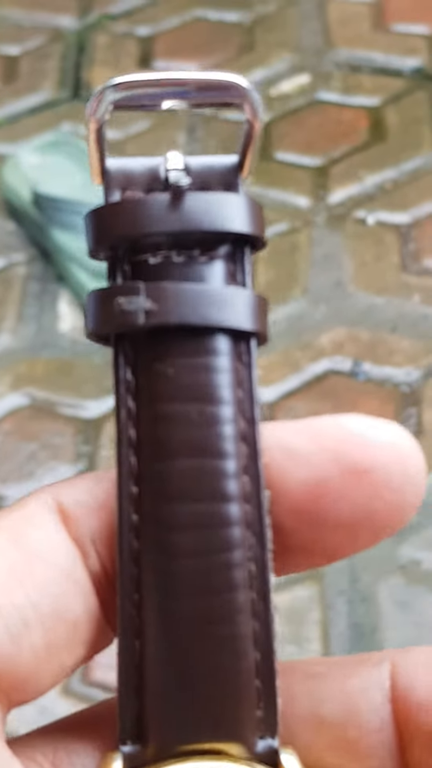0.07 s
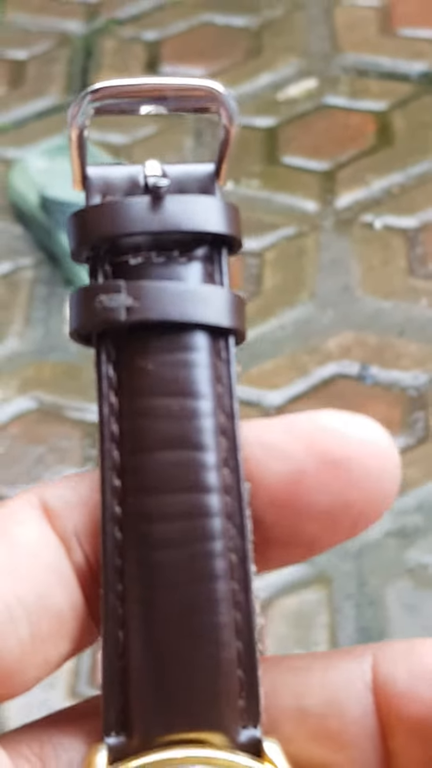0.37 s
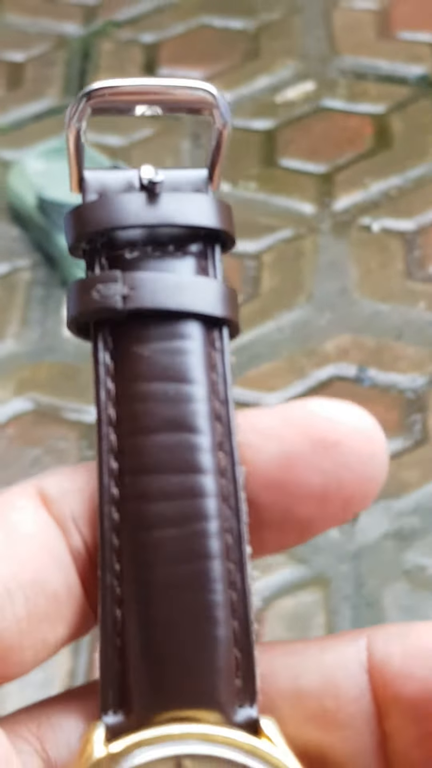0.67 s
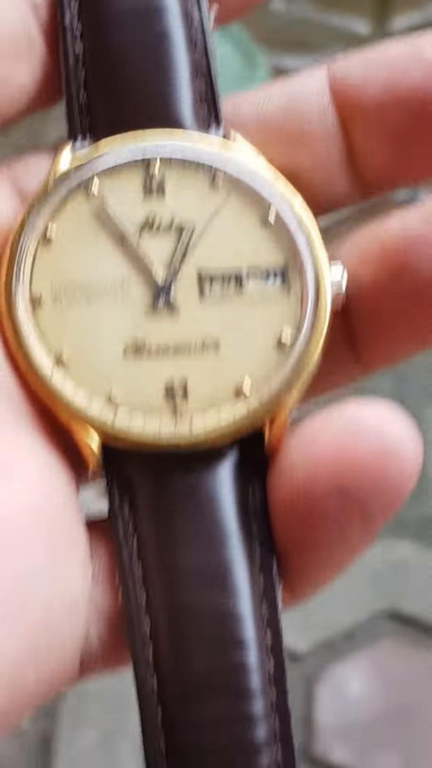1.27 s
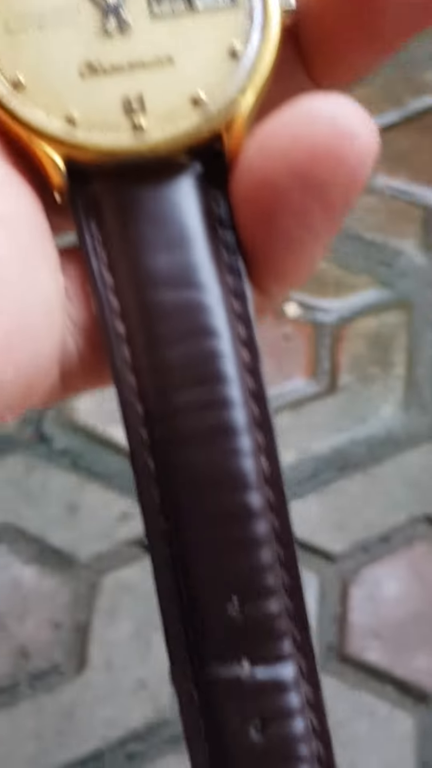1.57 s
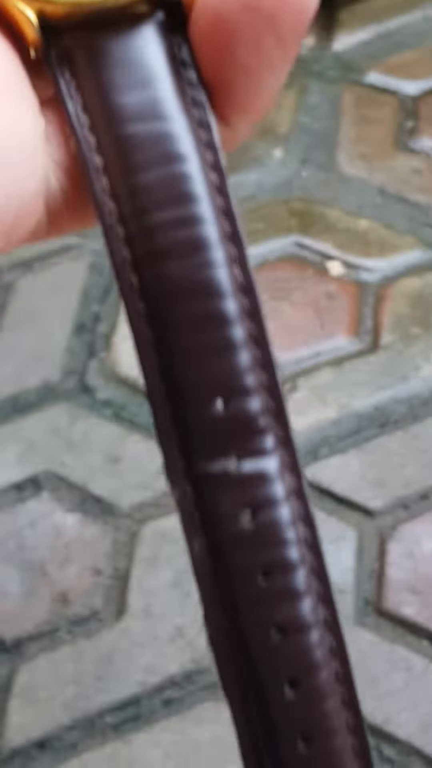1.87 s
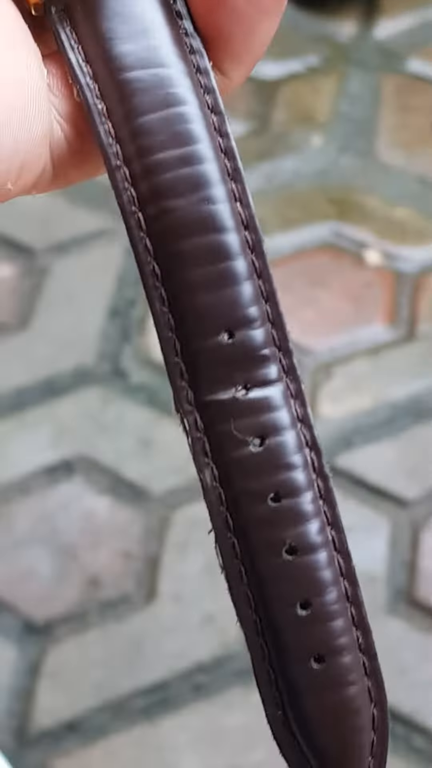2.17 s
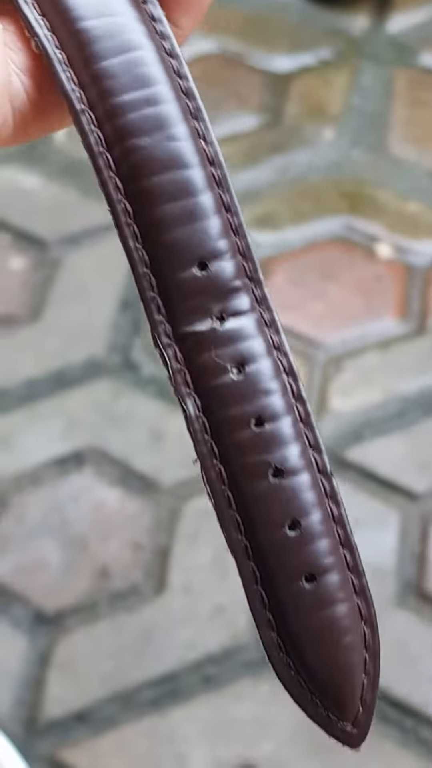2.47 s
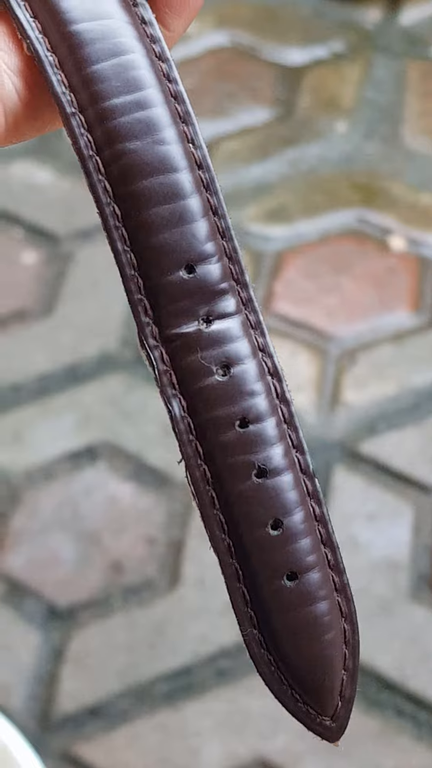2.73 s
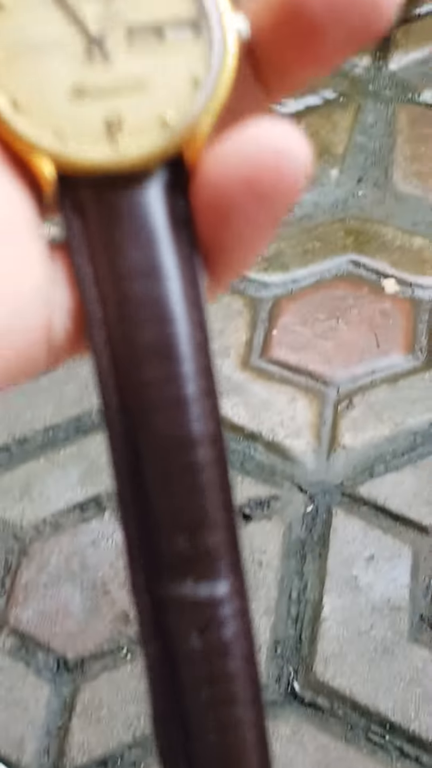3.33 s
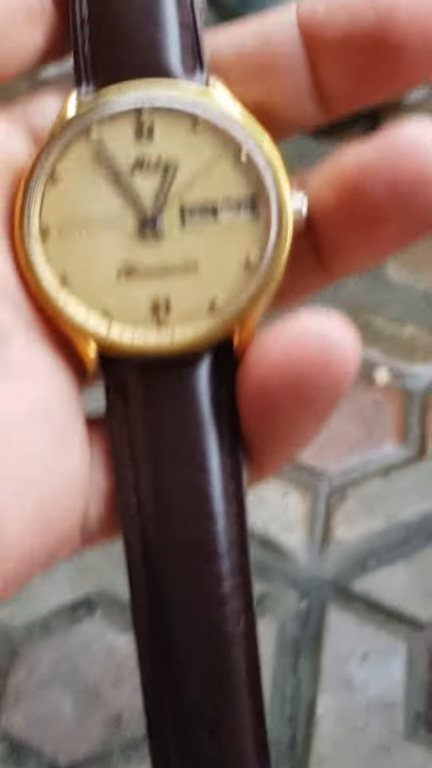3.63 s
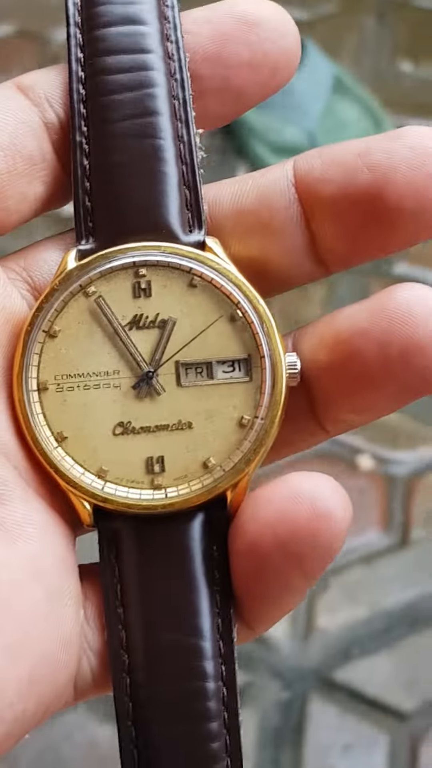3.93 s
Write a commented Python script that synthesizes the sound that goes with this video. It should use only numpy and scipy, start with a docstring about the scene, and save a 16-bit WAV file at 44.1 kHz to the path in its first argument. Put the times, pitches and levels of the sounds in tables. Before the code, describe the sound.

One sharp metallic click from a handled watch, soft bumps, a bird chirp and a distant engine.

```python
"""A wristwatch is turned in the hand: one sharp tick, soft rubs of skin and strap, dull bumps.
A small bird whistles one rising chirp that rings between the walls of a paved yard.
In the distance a motor vehicle swells with exhaust noise, engine tones and a whirr.
Far animals call faintly over low town rumble and a thin hiss."""
import sys
import numpy as np
from scipy import signal
from scipy.fft import rfft, irfft
from scipy.io import wavfile
from scipy.ndimage import map_coordinates

SR = 44100
rng = np.random.default_rng(int(sys.argv[2]) if len(sys.argv) > 2 else 0)


def generate_wav(signal):
    """Clip the signal to [-1, 1] and save it as 16-bit WAV at the path in sys.argv[1]."""
    frames = np.transpose(np.atleast_2d(signal))
    scaled = np.clip(frames, -1, 1) * 32767
    pcm = np.round(scaled).astype(np.int16)
    wavfile.write(sys.argv[1], SR, pcm)


N = 176400
TIME = np.arange(N) / SR
BIN_HZ = np.arange(N // 2 + 1) * SR / N
HAND_PAN_DB, HAND_T60_S = 19.5, 0.34  # pan: left minus right


# Metal resonances: pitch_hz, width_hz, gain_db
WATCH_MODES = [(6060, 1600, -3), (11100, 1800, -2.5), (13800, 2500, -7)]

def watch_tick():
    """One impact and a brief rattle ring the watch's metal."""
    start_s, impact_db, rattle_db, rattle_decay_s = 1.1123, -19, -36, 0.004
    rattle_envelope = (TIME > start_s) * np.exp(-np.abs(TIME - start_s) / rattle_decay_s)
    contact = from_db(rattle_db) * rng.standard_normal(N) * rattle_envelope
    contact[int(start_s * SR)] += from_db(impact_db)
    ring = np.zeros(N)
    for k, (pitch_hz, width_hz, gain_db) in enumerate(WATCH_MODES):
        resonance = signal.iirpeak(pitch_hz, pitch_hz / width_hz, fs=SR)
        ring += (-1) ** k * from_db(gain_db) * signal.lfilter(*resonance, contact)
    return in_yard(butter(ring, "high", hz=4200), HAND_PAN_DB, HAND_T60_S, wet_db=1)


# Friction strokes: start_s, length_s, centre_hz, width_hz, level_db
STRAP_RUBS = [(.73, .047, 5730, 1290, -64), (.95, 0.035, 9300, 2000, -70), (1.64, 0.037, 12300, 4000, -66),
              (1.675, 0.046, 9100, 2800, -66.5), (1.92, 0.053, 1250, 199, -70.5),
              (2.03, 0.048, 3680, 1200, -70.5), (2.13, 0.084, 11900, 3000, -66),
              (2.26, .06, 5000, 3500, -69), (2.85, 0.03, 7900, 4030, -70.5),
              (2.885, 0.059, 4260, 1080, -62), (3.005, 0.039, 7450, 2800, -59),
              (3.27, 0.044, 9400, 2620, -66.5), (3.72, 0.062, 5260, 700, -77.5),
              (3.94, 0.034, 10200, 3500, -68.5)]

def strap_rubs():
    """Skin and strap slide in short, grainy strokes."""
    strokes = bursts(STRAP_RUBS, rise_share=0.38, order=1)
    grain_db = 1.5 * drift(rate_hz=99)
    return in_yard(strokes * from_db(grain_db), HAND_PAN_DB, HAND_T60_S)


# Shifts of the grip: start_s, length_s, centre_hz, width_hz, level_db
GRIP_BUMPS = [(1.74, 0.11, 97, 52.4, -36.5), (1.71, 0.074, 337, 158, -64), (2.05, 0.34, 124, 81, -46.5),
              (2.80, 0.11, 58, 55.4, -34.5), (2.81, .1, 219, 109, -44.5), (3.23, 0.21, 225, 70, -48),
              (3.39, 0.098, 86.5, 64, -33.5), (3.5, 0.25, 50, 22.2, -41)]

def grip_bumps():
    """The shifting grip bumps dully; the fingers give one soft knock."""
    knock_s, knock_hz, decay_s, knock_db = 3.3605, 318, 0.0033, -26
    age_s = np.maximum(TIME - knock_s, 0)
    knock = from_db(knock_db) * np.sin(2 * np.pi * knock_hz * age_s) * np.exp(-age_s / decay_s)
    bumps = bursts(GRIP_BUMPS, rise_share=0.28)
    return butter(bumps + knock, "low", hz=820) * pan(db=-20)


# Whistle contour: time_s, pitch_hz
BIRD_PITCH = [(1.245, 4600), (1.258, 4780), (1.272, 4870), (1.286, 4960), (1.305, 5130), (1.320, 5290),
              (1.337, 5350), (1.353, 5620), (1.366, 6150), (1.380, 6800), (1.393, 6900), (1.408, 6720)]
# Whistle envelope: time_s, level_db
BIRD_LEVEL = [(1.245, -67), (1.257, -55), (1.272, -52), (1.284, -57), (1.308, -58), (1.319, -54),
              (1.337, -53.5), (1.348, -55), (1.366, -48.5), (1.380, -51), (1.393, -56), (1.408, -57)]
# Harmonics 2 and 3: gain_db
BIRD_OVERTONES = [-21, -27]
# Direct path, swelling and fading against the echoes: time_s, gain_db
BIRD_DIRECT = [(1.25, 0), (1.272, 5), (1.284, 1), (1.306, -1), (1.32, 7.5), (1.336, 7.5), (1.35, -4),
               (1.41, -5)]

def bird_chirp():
    """A nearly pure whistle climbs slowly, then flicks upward."""
    start_s, end_s, edge_s = BIRD_PITCH[0][0], BIRD_PITCH[-1][0], 0.012
    pitch_hz = in_time(BIRD_PITCH) + 42 * drift(rate_hz=320)
    phase = 2 * np.pi * np.cumsum(pitch_hz) / SR
    overtones = sum(from_db(db) * np.sin(k * phase) for k, db in enumerate(BIRD_OVERTONES, 2))
    gate = np.clip(np.minimum(TIME - start_s, end_s - TIME) / edge_s, 0, 1)
    level_db = in_time(BIRD_LEVEL) + 1.4 * drift(rate_hz=90)
    whistle = np.sqrt(2) * (np.sin(phase) + overtones) * from_db(level_db) * gate
    return in_yard(whistle, pan_db=15, t60_s=0.47, wet_db=-2, direct_db=in_time(BIRD_DIRECT))


# Exhaust colour: frequency_hz, gain_db
EXHAUST_SPECTRUM = [(150, -3), (260, -5.5), (400, -8), (520, -11), (680, -18), (790, -22.5), (1100, -27),
                    (1600, -35.5), (3000, -63)]
# Exhaust balance: frequency_hz, pan_db
EXHAUST_PAN = [(200, -1.5), (380, 9.5), (520, 7.5), (700, 11), (1300, 2.5)]
# Exhaust swell: time_s, level_db
EXHAUST_LEVEL = [(0, -74), (.9, -69.5), (1.3, -69.5), (1.801, -64), (2.3, -52.5), (2.899, -52),
                 (3.35, -51.5), (3.7, -55), (4, -56)]

def exhaust():
    """Exhaust noise swells, its upper part to the left."""
    spectrum = rfft(noise(EXHAUST_SPECTRUM)) * side_gains(per_bin(EXHAUST_PAN))
    return irfft(spectrum, N) * from_db(in_time(EXHAUST_LEVEL))


# Engine partials: pitch_hz, glide_hz_per_s, peak_s, half_length_s, level_db, pan_db
ENGINE_TONES = [(275.5, 7.5, 3.1, 0.79, -55, 4.5), (399.1, -5, 3.2, 1.25, -61.5, -2.5),
                (514.5, -6, 2.95, 0.47, -62.5, 14), (656, -10.5, 2.6, 0.48, -68.5, 10)]

def engine_tones():
    """Held tones waver with engine speed; each glides a little and swells in turn."""
    out = np.zeros((2, N))
    speed = 1 + 0.004 * drift(rate_hz=4.24)
    for pitch_hz, glide_hz_per_s, peak_s, half_length_s, level_db, pan_db in ENGINE_TONES:
        hz = (pitch_hz + glide_hz_per_s * (TIME - peak_s)) * speed
        phase = 2 * np.pi * np.cumsum(hz) / SR
        flutter_db = 2 * drift(rate_hz=5)
        swell = from_db(level_db + flutter_db) / (1 + ((TIME - peak_s) / half_length_s) ** 4)
        # Echoes shift the phase differently on each side.
        scatter_rad = 0.7 * np.array([drift(rate_hz=9.9) for _ in range(2)])
        out += np.sqrt(2) * swell * np.sin(phase + scatter_rad) * pan(pan_db)
    return out


# Whirr colour: frequency_hz, gain_db
WHIRR_SPECTRUM = [(1200, -15.5), (1700, -7.5), (2250, 5.5), (2700, -6), (3400, -13.5), (4600, -12.5),
                  (6500, -19.5), (10000, -16)]
# Whirr swell: time_s, level_db
WHIRR_SWELL = [(0, -102), (1.8, -83), (1.93, -67.5), (2.3, -67), (2.55, -63), (2.78, -67.5), (3.1, -61),
               (3.5, -70), (3.948, -64.5)]

def engine_whirr():
    """A high mechanical whirr wavers in pitch and level."""
    read_index = np.cumsum(1 + 0.04 * drift(rate_hz=4))
    whirr = np.array([map_coordinates(side, [read_index], mode="wrap") for side in noise(WHIRR_SPECTRUM)])
    level_db = in_time(WHIRR_SWELL) + drift(rate_hz=30)
    return whirr * from_db(level_db) * pan(db=7)


# Far calls: start_s, length_s, centre_hz, width_hz, level_db
ANIMAL_CALLS = [(.2, 0.15, 3610, 160, -77), (.3, 0.15, 3080, 340, -74), (.37, 0.071, 870, 397, -68.5),
                (.56, 0.089, 2650, 600, -75.5), (.73, 0.076, 780, 200, -69), (.73, 0.17, 2620, 453, -72),
                (.87, 0.035, 7240, 700, -67), (1.22, 0.054, 830, 130, -68.5),
                (1.463, 0.043, 980, 150, -65.5), (1.575, 0.051, 830, 220, -66),
                (1.6, 0.082, 1330, 350, -75), (3.92, 0.037, 2620, 553, -65)]

def far_animals():
    """Faint, narrow-band calls echo in the yard."""
    return in_yard(bursts(ANIMAL_CALLS, rise_share=0.36), pan_db=17.5, t60_s=0.31)


# Rumble colour: frequency_hz, gain_db
TOWN_SPECTRUM = [(30, -20), (40, -8.5), (53, -2.5), (80, -2), (112, -3.5), (131, -1.5), (150, -11.5),
                 (180, -14), (266, -20), (310, -24), (490, -41), (800, -51), (1500, -69)]
# Rumble envelope: time_s, gain_db
TOWN_LEVEL = [(0, -42), (.4, -45), (.55, -38.5), (.95, -41.5), (1.15, -42), (1.55, -40), (1.7, -36),
              (2.1, -37), (2.47, -38.5), (2.68, -45.5), (2.85, -37), (3.2, -42), (3.45, -35), (3.7, -43.5),
              (4, -38)]
# Rumble balance: time_s, pan_db
TOWN_PAN = [(0, 2), (1.3, 3.5), (1.7, -1.5), (2.3, 1.5), (3.3, 1), (3.7, 3)]

def town_rumble():
    """Low town noise and a wavering drone reach the left side slightly late."""
    trim_db, drone_hz, lag_s = -0.5, 111.1, 0.00039
    rumble = noise(TOWN_SPECTRUM) * from_db(in_time(TOWN_LEVEL) + trim_db)
    drone_db = -45 + 3.9 * drift(rate_hz=10)
    wander_rad = 1.73 * drift(rate_hz=3.68)
    drone = from_db(drone_db) * np.sin(2 * np.pi * drone_hz * TIME + wander_rad)
    left, right = (rumble + drone) * side_gains(in_time(TOWN_PAN))
    return np.array([delayed(left, lag_s), right])


# Hiss colour: frequency_hz, gain_db
HISS_SPECTRUM = [(530, -26), (900, -6.5), (1350, -3.5), (2000, -4.5), (2700, -9), (3600, -11), (4300, -7.5),
                 (5200, -7.5), (6500, -9.5), (8000, -13), (10600, -5.5), (14500, -4.5), (15800, -5)]
# Hiss envelope: time_s, level_db
HISS_LEVEL = [(0, -68), (.4, -68.5), (.55, -66), (1.05, -66.5), (1.7, -67), (2.6, -68.5), (4, -67)]
# Sizzle colour: frequency_hz, gain_db
SIZZLE_SPECTRUM = [(2200, -10), (3400, 1), (4800, -2.5), (7000, -7.5), (10000, 2.5), (12500, 2),
                   (15500, -14)]
# Sizzle envelope: time_s, level_db
SIZZLE_FADE = [(0, -69.5), (.27, -68.5), (.44, -67), (.52, -84), (.8, -100)]

def air_hiss():
    """Faint hiss flickers throughout; a thin sizzle fades after half a second."""
    hiss = noise(HISS_SPECTRUM) * from_db(in_time(HISS_LEVEL)) * pan(db=4.5)
    flicker_db = 1.44 * drift(rate_hz=24)
    sizzle = noise(SIZZLE_SPECTRUM) * from_db(in_time(SIZZLE_FADE)) * pan(HAND_PAN_DB)
    return hiss * from_db(flicker_db) + sizzle


# Left-right likeness: frequency_hz, correlation
STEREO_LIKENESS = [(60, 0.57), (120, 0.9), (240, 1), (480, 0.18), (700, 0), (4000, 0.02)]

def noise(spectrum):
    """Coloured stereo noise at unit power, alike in the bass, falling steeply past its ends."""
    low_hz, high_hz = spectrum[0][0] / 1.3, spectrum[-1][0] * 1.2
    edges = 1 / (1 + (BIN_HZ / high_hz) ** 8) / (1 + (low_hz / (BIN_HZ + 1)) ** 4)
    mid, side = rfft(rng.standard_normal((2, N))) * from_db(per_bin(spectrum)) * edges
    alike = per_bin(STEREO_LIKENESS)
    return unit_rms(irfft(np.sqrt(1 + alike) * mid + np.sqrt(1 - alike) * side * [[1], [-1]], N))


def bursts(rows, rise_share, order=2):
    """Short swells of band noise, each peaking at rise_share of its length."""
    out = np.zeros(N)
    for start_s, length_s, centre_hz, width_hz, level_db in rows:
        low_hz = np.sqrt(centre_hz ** 2 + width_hz ** 2 / 4) - width_hz / 2
        high_hz = min(low_hz + width_hz, SR / 2 - 100)
        band = unit_rms(butter(rng.standard_normal(N), "band", [low_hz, high_hz], order))
        age = np.maximum(TIME - start_s, 0) / (length_s * rise_share)
        out += from_db(level_db) * age * np.exp(1 - age) * band
    return out


def in_yard(x, pan_db, t60_s, wet_db=0, direct_db=0):
    """Direct sound, left side first, plus dense echoes from walls and paving."""
    gap_s, lag_s = 0.0032, 0.000483
    age_s = TIME[:SR]
    tail = rng.standard_normal((2, SR)) * from_db(-60 * age_s / t60_s) * (age_s > gap_s)
    tail /= np.sqrt(np.sum(tail ** 2, axis=1, keepdims=True))
    echoes = signal.fftconvolve(x[None], tail, axes=1)[:, :N]
    near = x * from_db(direct_db)
    direct = np.array([near, delayed(near, lag_s)])
    return direct * pan(pan_db) + echoes * from_db(wet_db) * pan(db=7)


def drift(rate_hz):
    """Smooth random wander, RMS about 1."""
    hop, settle = 40, 2000
    pole = np.exp(-2 * np.pi * rate_hz * hop / SR)
    white = rng.standard_normal(N // hop + settle + 2)
    slow = signal.lfilter([1], [1, -2 * pole, pole * pole], white)[settle:]
    return np.interp(np.arange(N) / hop, np.arange(len(slow)), unit_rms(slow))


def in_time(curve):
    """Curve value at every sample."""
    return np.interp(TIME, *np.transpose(curve))


def per_bin(curve):
    """Curve value at every FFT bin, on a log-frequency axis."""
    hz, values = np.transpose(curve)
    return np.interp(np.log(BIN_HZ + 1e-3), np.log(hz), values)


def side_gains(db):
    """Left and right gains, db apart."""
    return from_db(db * np.array([[0.5], [-0.5]]))


def pan(db):
    """Side gains with mean 1."""
    gains = side_gains(db)
    return gains / gains.mean()


def butter(x, kind, hz, order=2):
    return signal.sosfilt(signal.butter(order, hz, kind, fs=SR, output="sos"), x)


def delayed(x, lag_s):
    return np.interp(TIME - lag_s, TIME, x)


def from_db(db):
    return 10 ** (np.asarray(db) / 20)


def unit_rms(x):
    return x / np.sqrt(np.mean(x ** 2) + 1e-20)


def scene():
    """Watch, bird, vehicle and animals over the town background."""
    watch = watch_tick() + strap_rubs() + grip_bumps()
    vehicle = exhaust() + engine_tones() + engine_whirr()
    return watch + bird_chirp() + vehicle + far_animals() + town_rumble() + air_hiss()


def record(dry):
    """Steep low-pass."""
    cutoff_hz = 15800
    return signal.sosfilt(signal.ellip(12, 0.1, 80, cutoff_hz, fs=SR, output="sos"), dry)


dry = scene()
out = record(dry)
generate_wav(out)
```